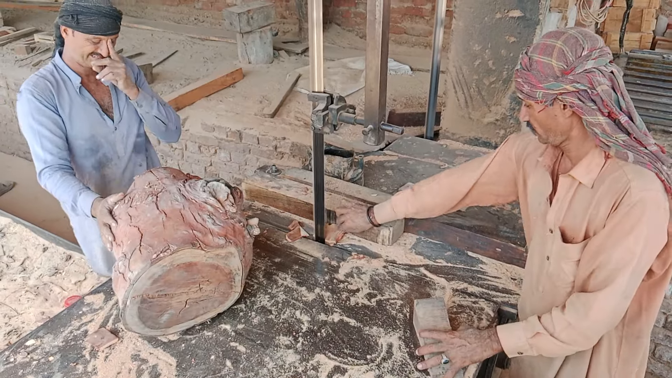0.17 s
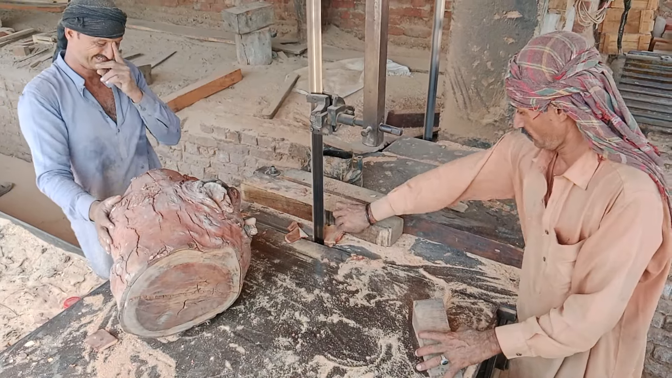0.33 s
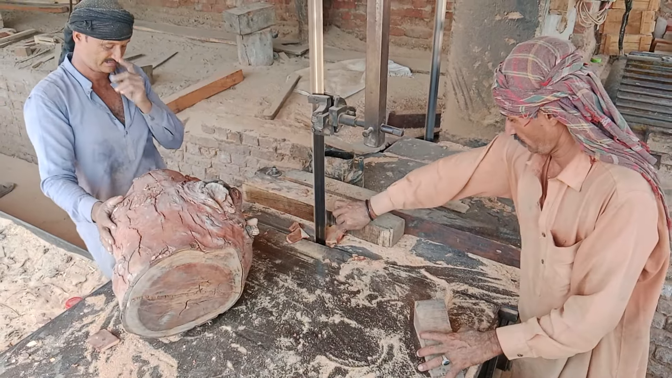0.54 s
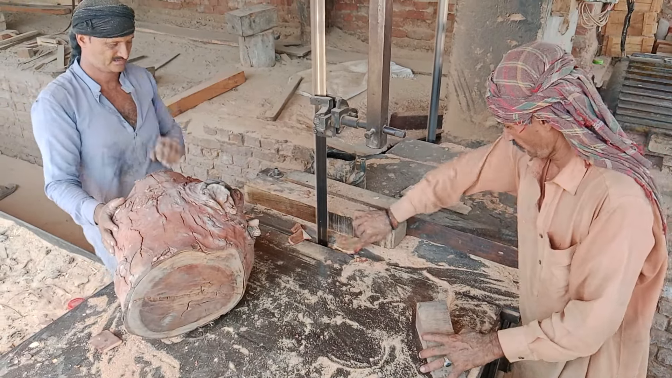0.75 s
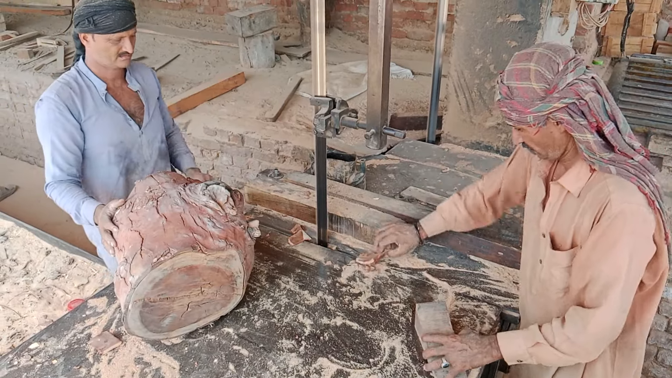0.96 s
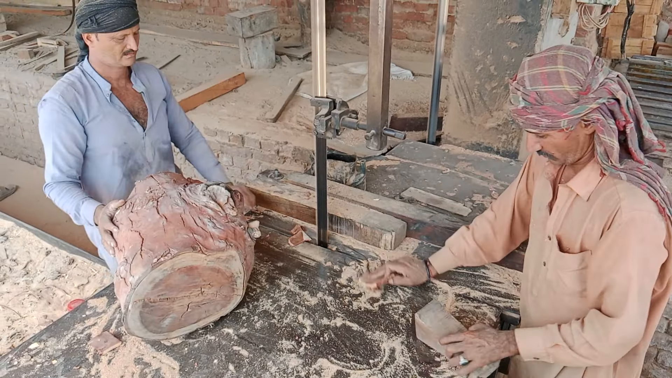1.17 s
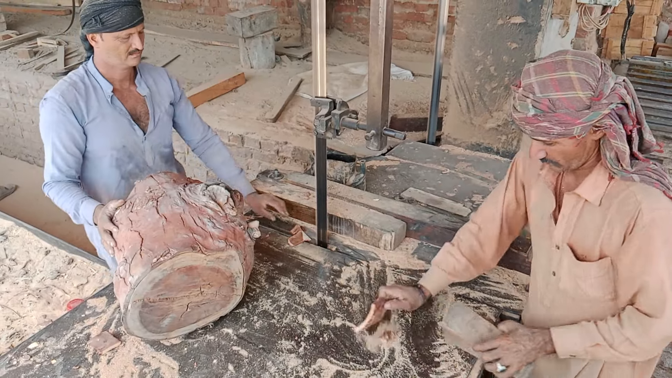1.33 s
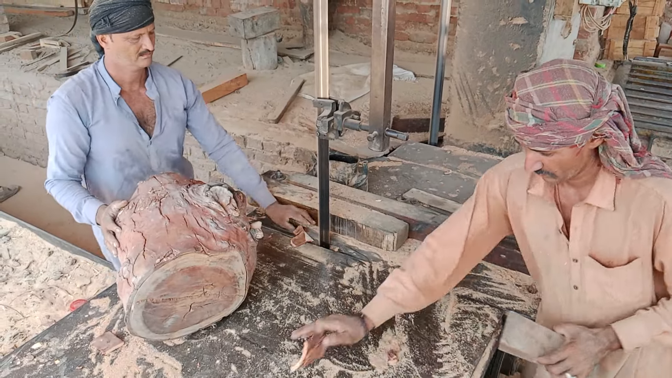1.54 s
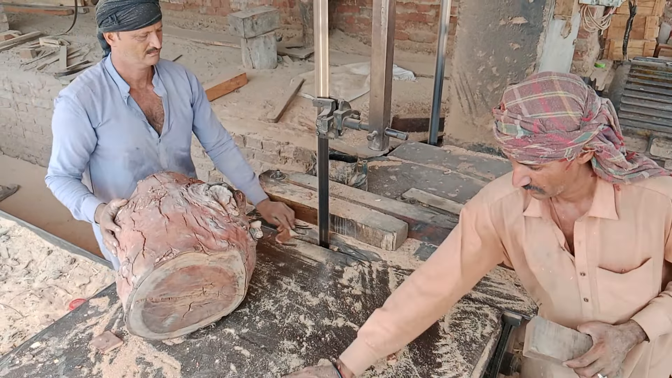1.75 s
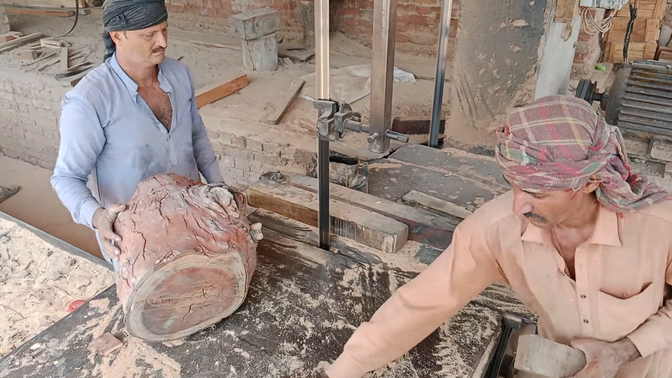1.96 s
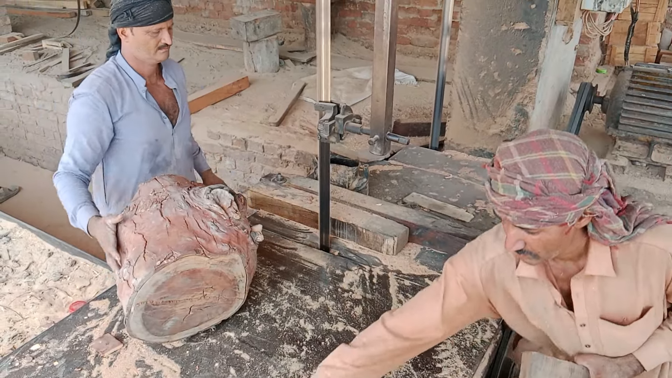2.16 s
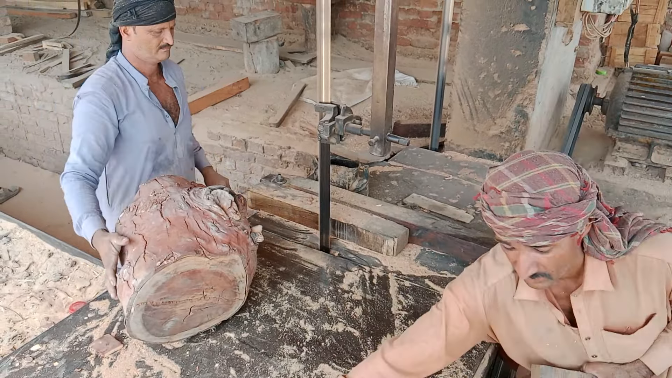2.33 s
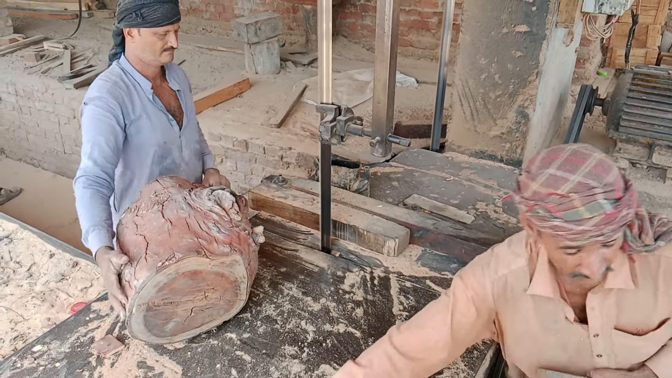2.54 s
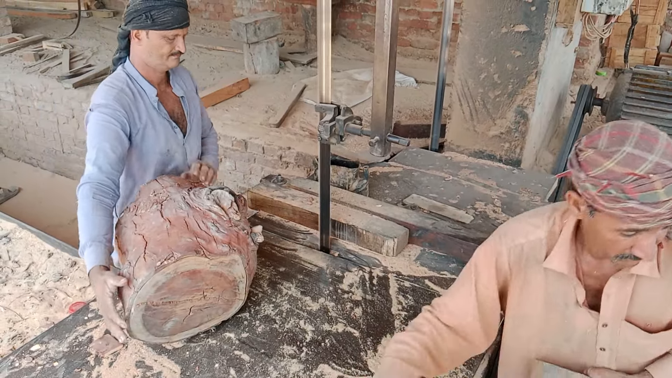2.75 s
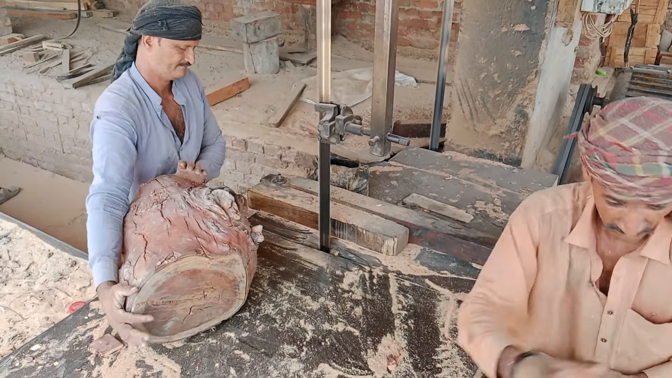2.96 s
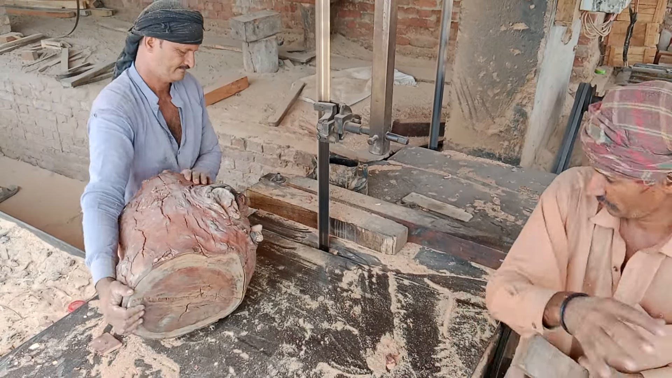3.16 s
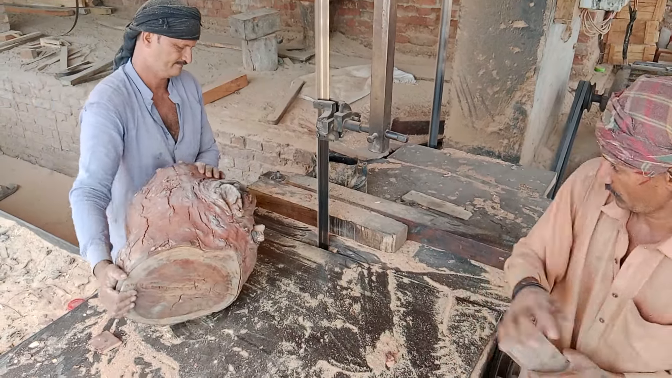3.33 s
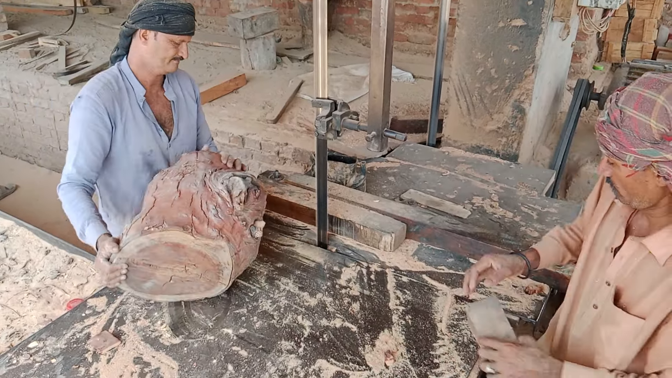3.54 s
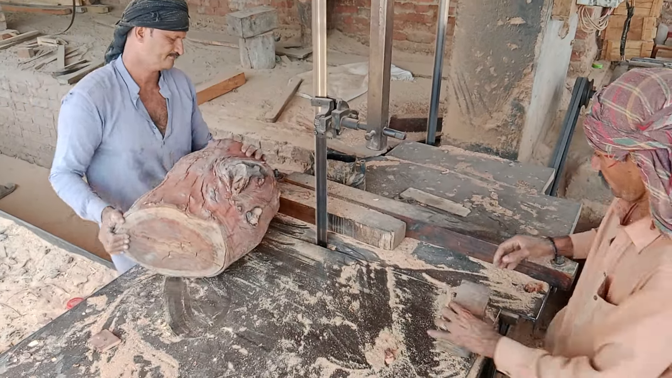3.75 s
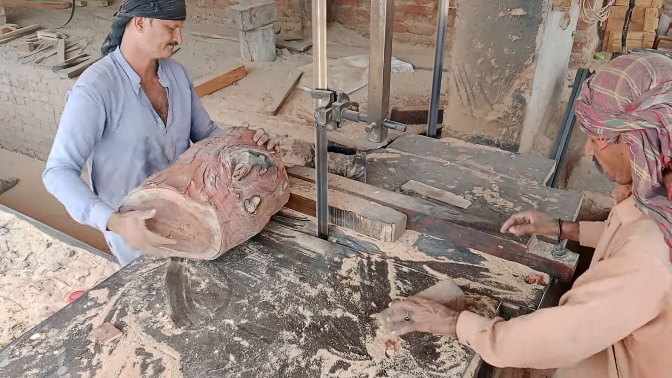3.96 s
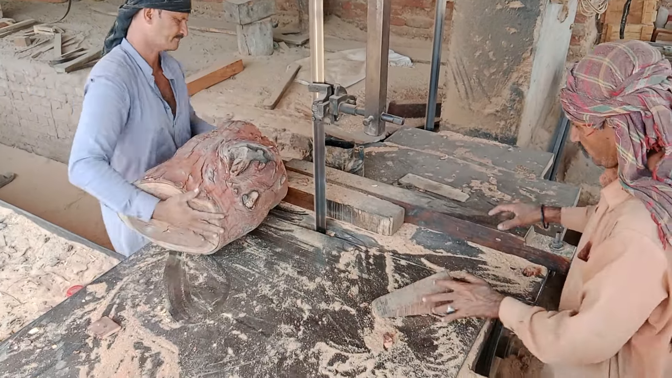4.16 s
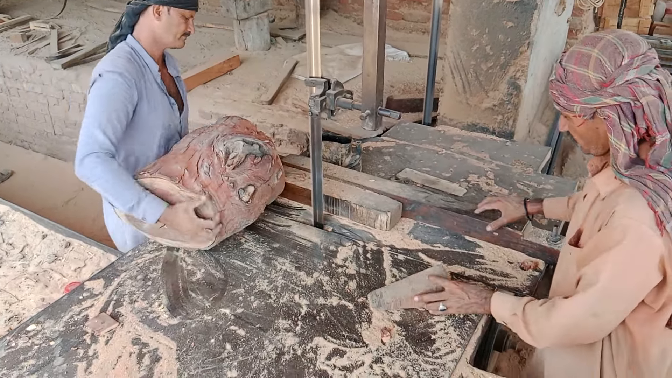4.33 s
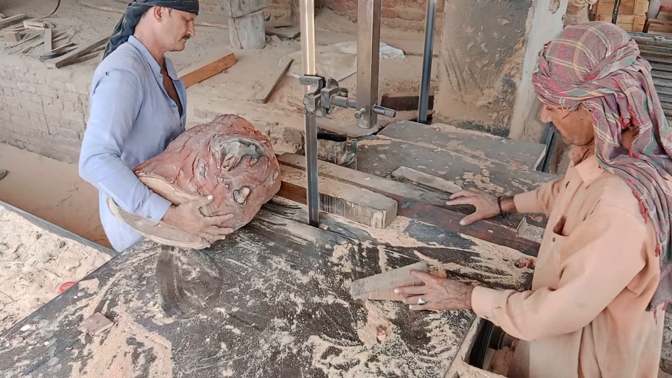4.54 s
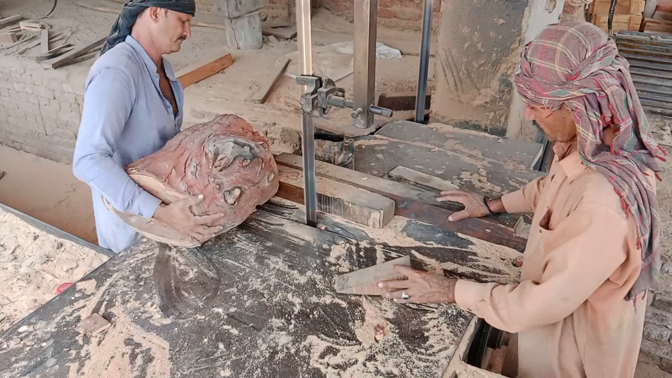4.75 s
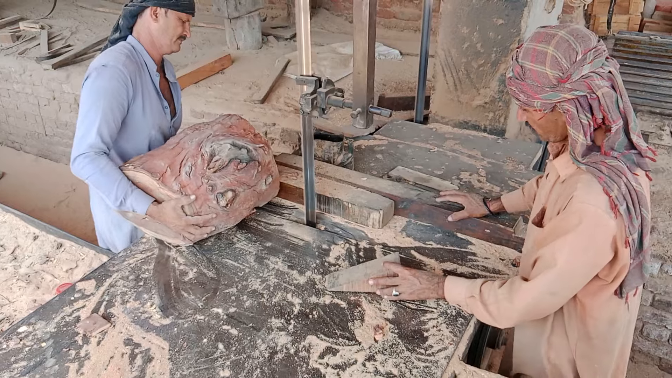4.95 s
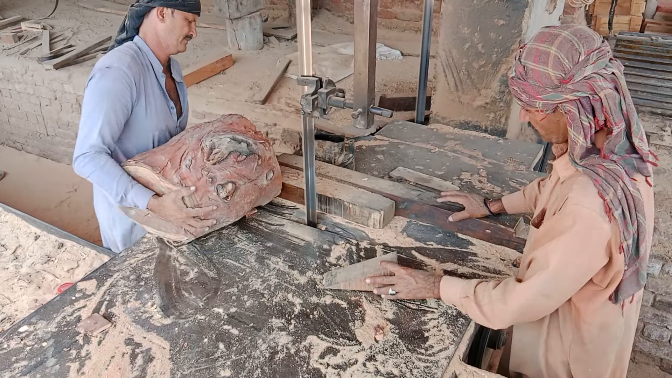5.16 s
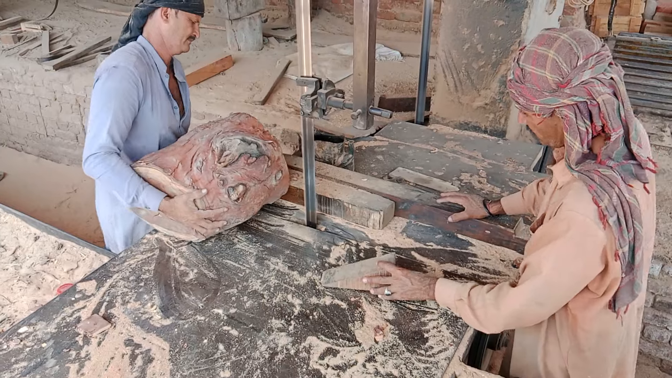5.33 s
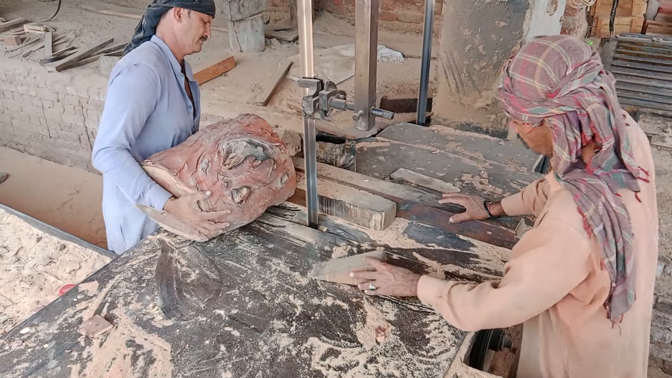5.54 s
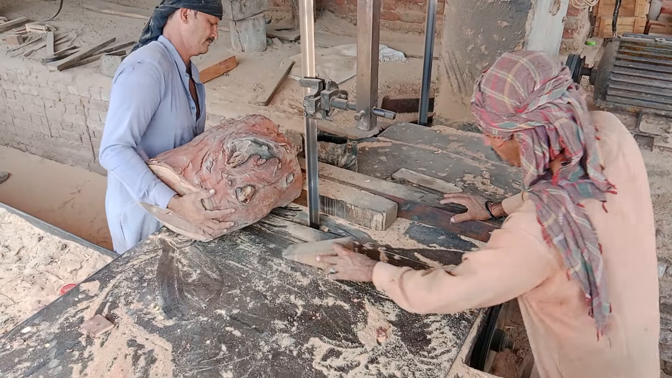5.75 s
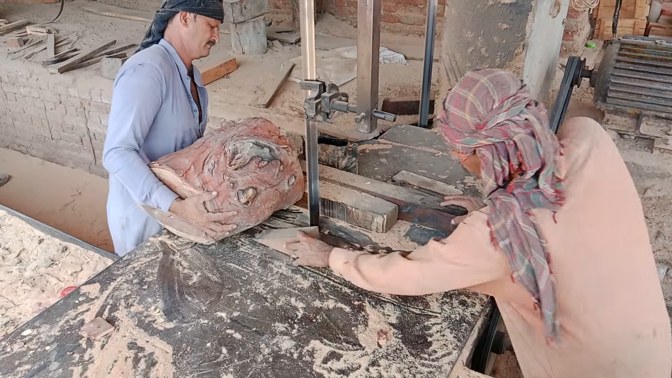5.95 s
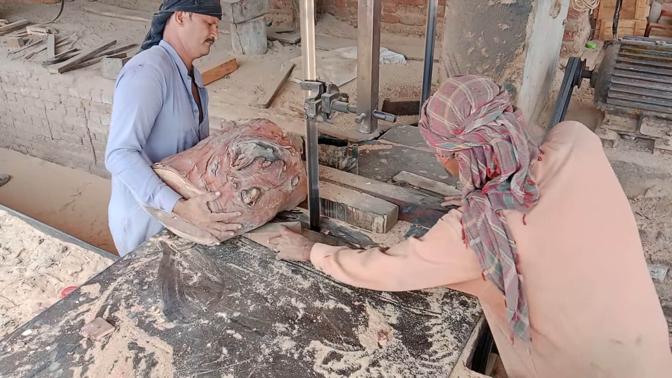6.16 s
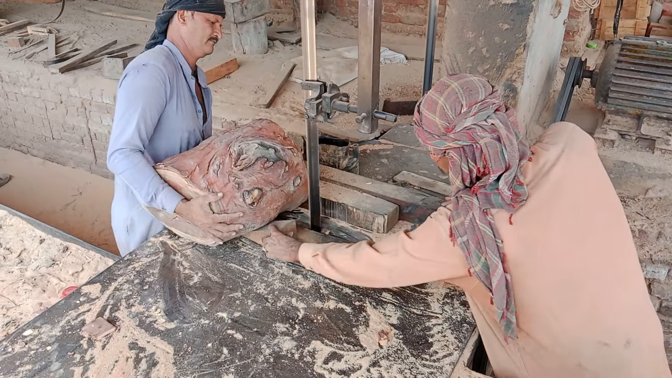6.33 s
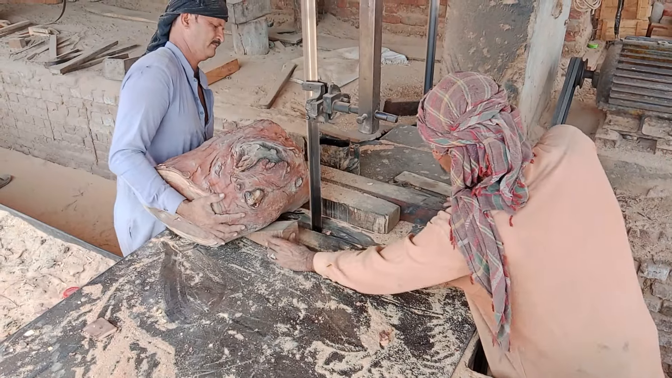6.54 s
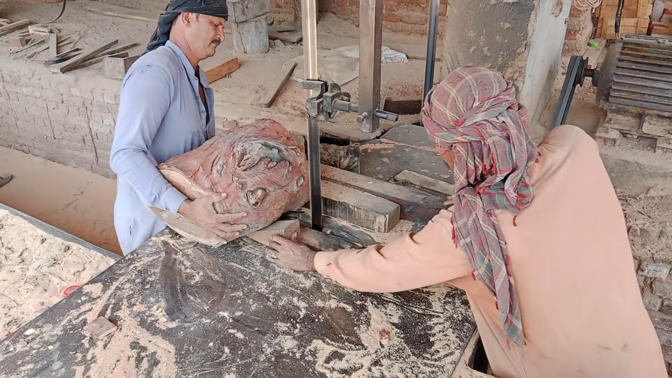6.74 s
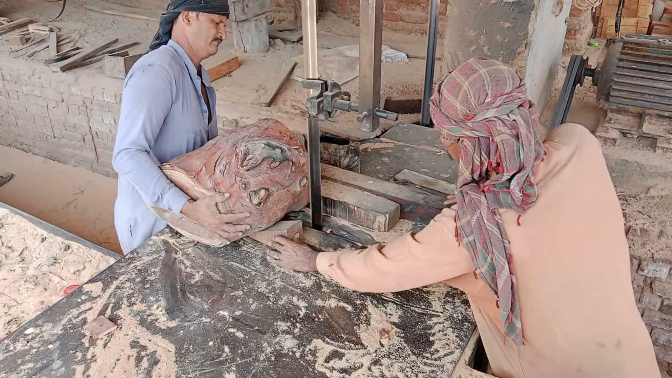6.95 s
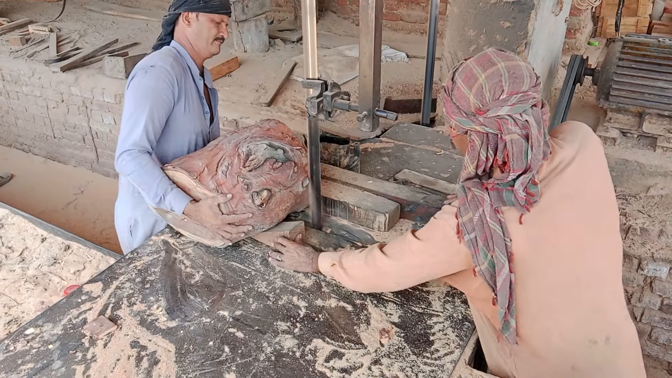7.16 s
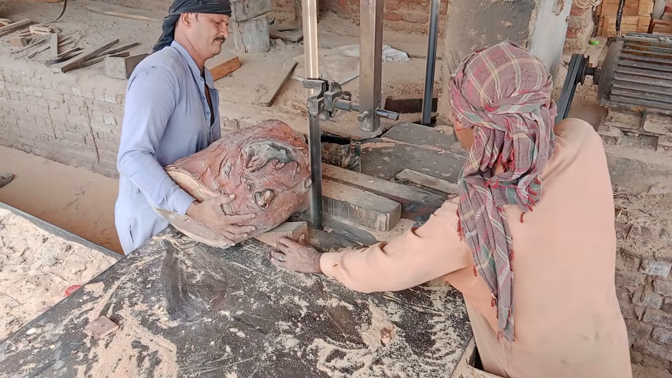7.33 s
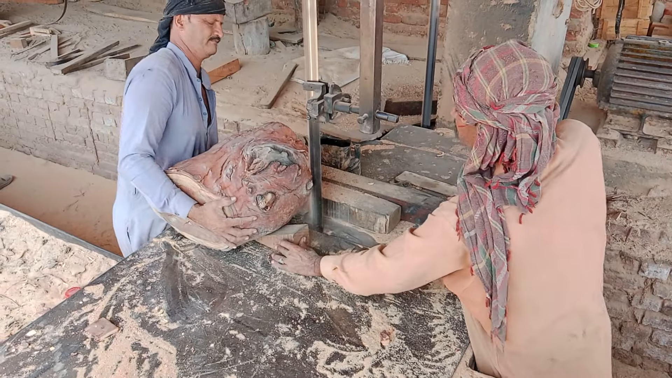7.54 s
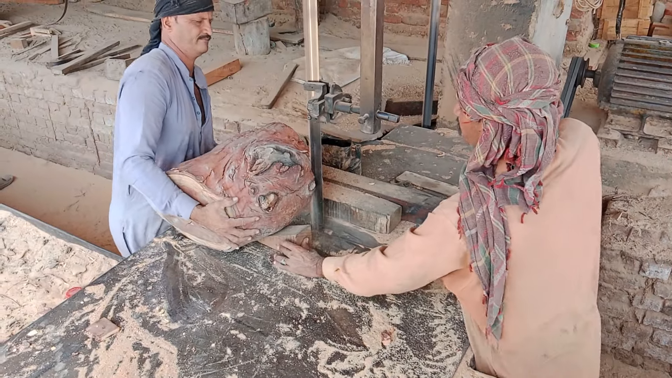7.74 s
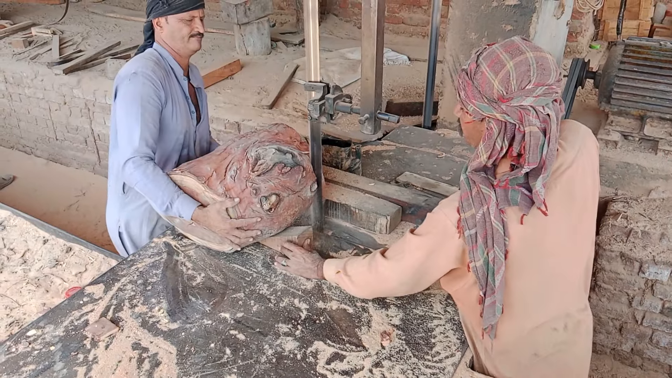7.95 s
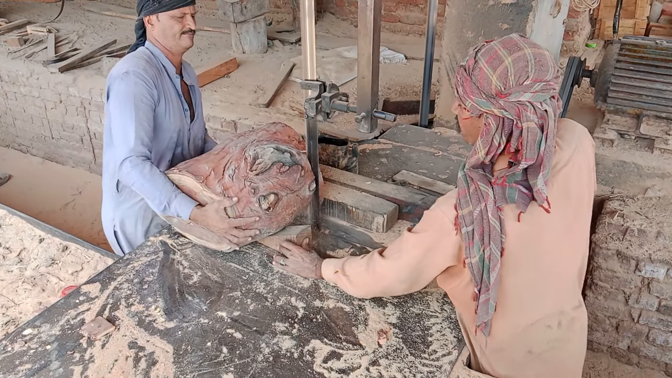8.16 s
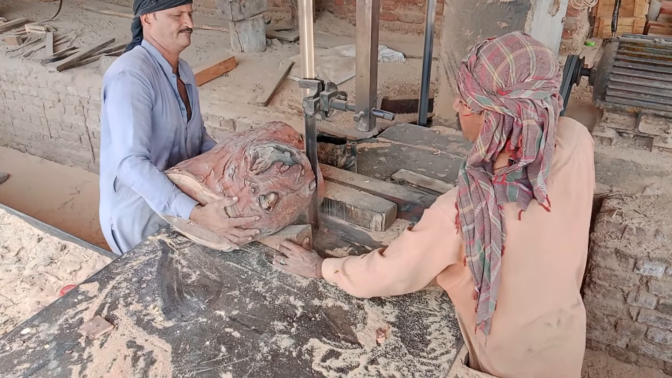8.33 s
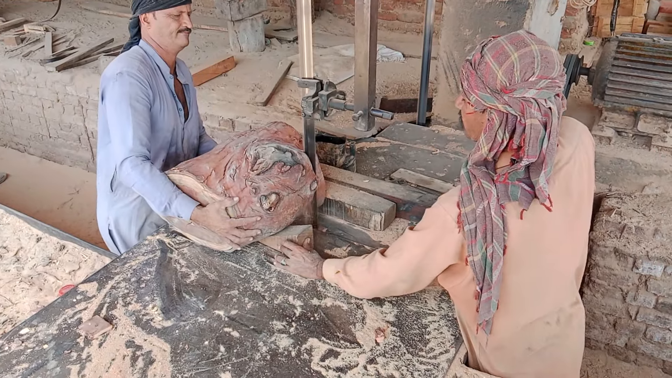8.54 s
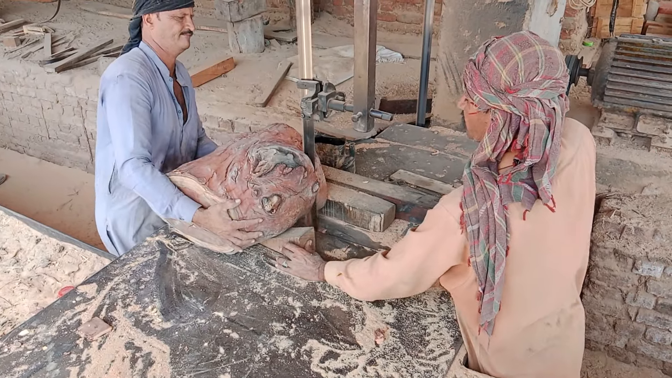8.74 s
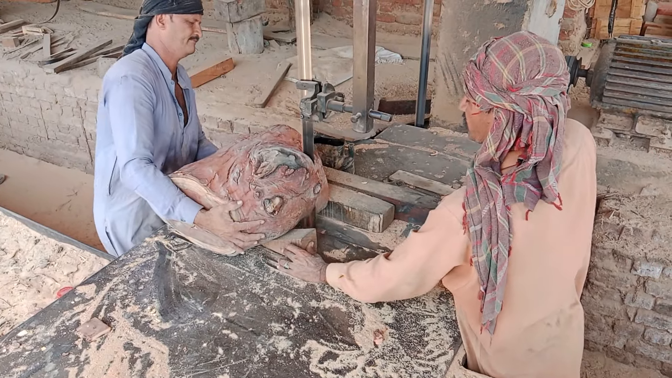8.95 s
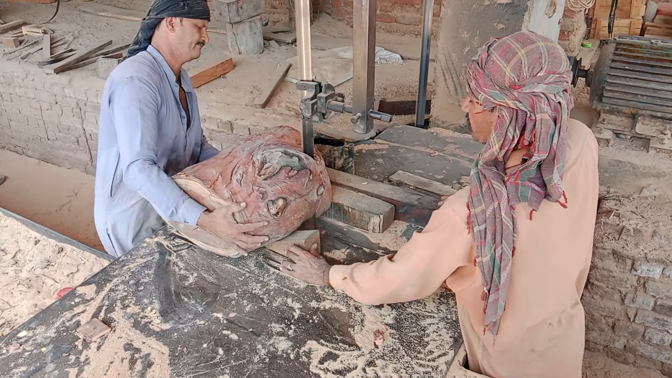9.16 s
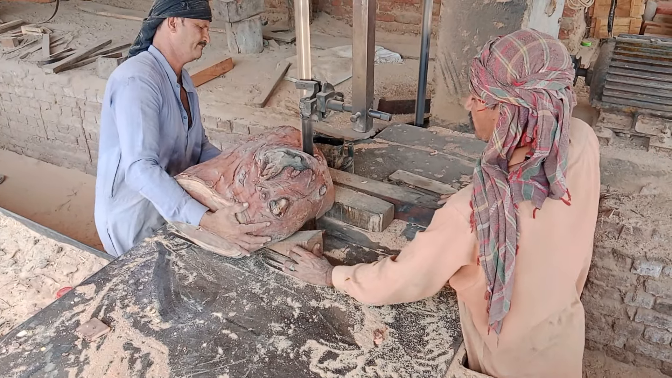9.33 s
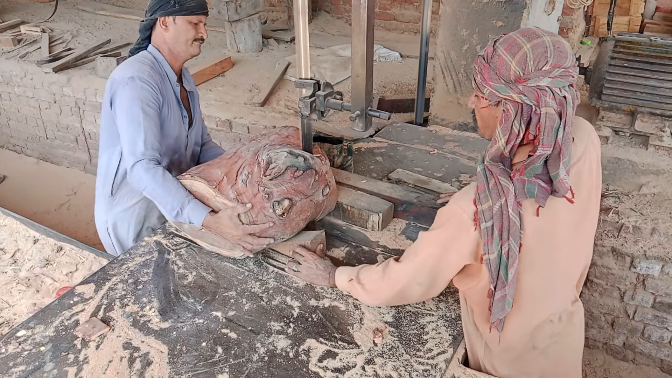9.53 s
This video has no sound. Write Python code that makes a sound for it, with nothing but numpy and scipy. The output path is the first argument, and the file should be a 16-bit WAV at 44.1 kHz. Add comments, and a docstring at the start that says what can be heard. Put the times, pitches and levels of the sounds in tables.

```python
"""Band saw cutting a log

In an open shed a big band saw idles: the steel band hisses and whines over its wheels, rubbed by guides and rims,
above a low frame rumble that drops out briefly now and then. A log is set on the table with a few wooden knocks.
Then the teeth bite: sharp taps on the tooth rate and tearing noise make the band sing, and a lumpy low roar,
slackening about four times a second, overloads one small mono microphone. The sources are dry, without echo.
All are filtered noise and taps, except the knocks: decaying sine modes of the wood."""
import sys
import numpy as np
from scipy import signal
from scipy.fft import rfft, irfft, next_fast_len
from scipy.io import wavfile

SR = 44100
rng = np.random.default_rng(int(sys.argv[2]) if len(sys.argv) > 2 else 0)


def invert_db(level):
    """Linear amplitude ratio for a level in decibels (20 dB per decade), elementwise."""
    return 10 ** (np.asarray(level, dtype=float) / 20)


def wrap_up_sound(samples):
    """Save the sound to the file named by the first command line argument, as 16-bit audio."""
    columns = np.atleast_2d(samples).T
    # keep every value between -1 and 1, then stretch to whole-number steps
    tamed = np.clip(columns, -1, 1)
    steps = np.round(tamed * 32767).astype(np.int16)
    wavfile.write(sys.argv[1], SR, steps)


N = 427329   # samples
SIZE = next_fast_len(N)
HZ = np.arange(SIZE // 2 + 1) * SR / SIZE + 1e-3   # frequency of each spectrum bin, kept above zero
TIME_S = np.arange(N) / SR


def rms_one(x):
    """Scales a signal to an rms of one."""
    return x / np.sqrt(np.mean(x ** 2) + 1e-20)


def in_time(rows):
    """Draws straight lines between timed rows, one curve per column after the time."""
    s, *columns = np.transpose(rows)
    return [np.interp(TIME_S, s, column) for column in columns]


def density(points, axis=1):
    """Power per Hz from a (Hz, dB) table, falling away beyond its ends."""
    p = np.array(points)
    inside = invert_db(2 * np.interp(np.log(HZ), np.log(p[:, 0]), p[:, axis]))
    below = np.minimum(1, HZ / p[0, 0]) ** 4
    above = np.maximum(1, HZ / p[-1, 0]) ** 2
    return inside * below / above


def drift(rate_hz):
    """Slow chance with spread 1: noise through two equal low-pass poles, made at a twentieth of the rate."""
    pole = np.exp(-2 * np.pi * rate_hz * 20 / SR)
    noise = rng.standard_normal(N // 20 + 4002)
    slow = signal.lfilter([1], [1, -2 * pole, pole * pole], noise)[4000:]   # settled part only
    return np.interp(np.arange(N) / 20, np.arange(len(slow)), rms_one(slow))


def colour(x, power):
    """Filters a signal by a power spectrum and scales it to an rms of one."""
    return rms_one(irfft(rfft(x, SIZE) * np.sqrt(power), SIZE)[:N])


# The load slows the band. Columns: time_s, tooth_rate (teeth per s)
TOOTH_RATE = [(7.2, 630), (8.0, 618.5), (9.0, 616), (9.69, 613.5)]


def teeth(bite_db, clean, cutting):
    """One sharp tap per tooth, uneven in time and depth, plus tearing fibres, all ringing the band."""
    rate, = in_time(TOOTH_RATE)
    wandering = rate * (1 + .002 * drift(6.0))
    count = np.cumsum(wandering) / SR + .004 * drift(120.0)   # teeth passed so far
    taps = sum(np.cos(2 * np.pi * k * count) for k in range(1, 26))   # equal harmonics make a pulse
    tooth_depth = invert_db(1.6 * rng.standard_normal(int(count.max()) + 3))
    depth = tooth_depth[np.round(count).astype(int)]
    tearing = rng.standard_normal(N) * invert_db(1.25 * drift(22.0))
    singing = colour(clean * rms_one(taps * depth) + tearing, band_response(axis=2))
    return cutting * invert_db(bite_db) * singing


# Wave families of the band, each starting at a cut-on pitch; levels compare within a state.
# Columns: cut_on_hz, edge_hz, fall_off_hz, idle_level_db, cutting_level_db
FAMILIES = [(2541, 23.5, 430, -4.5, -21), (4605, 330, 3050, -13, -16), (6718, 85, 820, 0.5, -1),
            (12400, 370, 2000, -15, -12.5)]
# Hiss under the families, relative. Columns: pitch_hz, idle_level_db (per Hz), cutting_level_db (per Hz)
HISS = [(298, -43, -40), (445, -34, -38), (626, -20.5, -44), (1162, -23, -16.5), (1155, -33, -19),
        (1480, -24, -34), (2070, -19, -32), (2250, -22, -24), (3800, -23, -38), (6750, -9, -9.5),
        (8070, -11, -15.5), (9300, -28, -41), (11700, -26, -24.5), (13300, -26.5, -19), (14700, -13, -9.5),
        (16000, -35, -44)]


def band_response(axis):
    """Each family starts abruptly at its cut-on, where its modes crowd, and thins out above."""
    power = density(HISS, axis=axis)   # axis 1 is idle, 2 is cutting
    for hz, edge_hz, fall_hz, *level_db in FAMILIES:
        above = (HZ - hz) / edge_hz
        onset = 1 / (1 + np.exp(-np.clip(3.5 * above, -50, 50)))
        crowding = 1 / np.sqrt(1 + np.abs(above))
        thinning = np.exp(-np.maximum(HZ - hz, 0) / fall_hz)
        power += invert_db(2 * level_db[axis - 1]) * onset * crowding * thinning
    return power


# Relative spectrum of the low roar. Columns: pitch_hz, level_db (per Hz)
ROAR_LOW = [(30, -74), (60, -12.5), (100, -1), (200, 1), (400, -1), (700, -5.5), (1400, -17.5)]
# Relative spectrum of the upper rasp. Columns: pitch_hz, level_db (per Hz)
ROAR_HIGH = [(300, -3.5), (700, 1.5), (1200, -1), (2000, -6), (3500, -10.5), (6000, -15), (10000, -23)]


def roar(low_db, upper_db, depth_db, cutting):
    """Noise in lumps of a few to ten milliseconds; the upper rasp comes in sharper bursts."""
    lumps = depth_db * drift(163.0)
    even_db = -depth_db ** 2 * np.log(10) / 20   # keeps the mean power of the low roar
    low = invert_db(lumps + even_db) * colour(rng.standard_normal(N), density(ROAR_LOW))
    bursts = invert_db(0.85 * lumps + 2.2 * even_db + 2.7 * drift(250.0))
    high = bursts * colour(rng.standard_normal(N), density(ROAR_HIGH))
    return cutting * (invert_db(low_db) * low + invert_db(upper_db) * high)


# The bite slackens about every 0.23 s; a negative loss is a gain, sag and regrip are the bell's two widths.
# Columns: deepest_s, roar_loss_db, rasp_loss_db, sag_s, regrip_s
SLACKS = [(7.226, 11, 14, 0.026, .014), (7.33, 14, 22, 0.032, 0.014), (7.564, 8, 12, .03, .012),
          (7.785, -1, 1.5, .05, 0.028), (8.02, 1, 3, .05, 0.023), (8.25, 2, 6, 0.059, 0.018),
          (8.48, -2.5, 7.5, .05, 0.022), (8.705, 9.5, 22, .025, 0.017), (8.92, 6.5, 12, 0.031, 0.036),
          (9.178, 11, 10, 0.056, 0.013), (9.405, 8.5, 12, 0.057, 0.04), (9.6, 14, 23, .025, 0.058)]


def slackening():
    """Losses in dB of roar and rasp: a bell per slack moment, with its own fall and rise."""
    losses_db = np.zeros((2, N))
    for s, roar_db, rasp_db, sag_s, regrip_s in SLACKS:
        width_s = np.where(TIME_S < s, sag_s, regrip_s)
        bell = np.exp(-((TIME_S - s) / width_s) ** 2)
        losses_db += np.outer([roar_db, rasp_db], bell)
    return losses_db


SWAY_HZ = 2.9   # rate of a slow sway in the idle, per second
# Level of the idling band. Columns: time_s, hiss_level_db
IDLE = [(0.0, -18.5), (0.47, -19.5), (1.1, -19), (3.2, -19), (3.68, -18.5), (6.31, -19.5), (6.8, -19),
        (7.1, -20)]
# Single frame and band modes. Columns: pitch_hz, width_hz
IDLE_MODES = [(890, 45), (1064, 30), (1763, 35), (1885, 60), (2548, 45), (2994, 45), (3220, 120),
              (3512, 55), (3788, 50), (3970, 150), (4136, 65), (4293, 55), (5200, 260), (6762, 90)]
# Their levels on the scale of the idle hiss, in the same order. Column: level_db
IDLE_MODE_DB = [-15.5, -18, -16, -18.5, -6, -10.5, -12, -14, -13, -17, -12.5, -14, -12, -18]


def idling_band(patchy_db):
    """Guides and wheel rims rub the band; each region flutters on its own and a little with the others."""
    hiss_db, = in_time(IDLE)
    power = band_response(axis=1)
    for (hz, width_hz), db in zip(IDLE_MODES, IDLE_MODE_DB):
        power += invert_db(2 * db) / (1 + (2 * (HZ - hz) / width_hz) ** 2) ** 2
    spectrum = rfft(rng.standard_normal(SIZE)) * np.sqrt(power)
    edges = np.geomspace(200, 17000, 13)
    together = drift(6.0)
    sway = np.cos(2 * np.pi * SWAY_HZ * TIME_S + 1.0)
    out = np.zeros(N)
    for low, high in zip(edges, edges[1:]):
        part = irfft(spectrum * ((HZ >= low) & (HZ < high)), SIZE)[:N]
        calm = (1000 / low) ** 0.46   # the treble is steadier
        top_flutter_db = .8 * drift(17.0) * (low > 9000)   # the very top has an extra fast flutter
        patches = 1.8 * together + 1.5 * drift(3.3) + 2.0 * drift(15.4) + 0.081 * sway   # sway is very faint
        out += part * invert_db(top_flutter_db + patchy_db * calm * patches)
    return invert_db(hiss_db) * rms_one(out)


# Blows of wood on the table, before the wood's own mode levels.
# Columns: start_s, level_db, pitch_hz (the pitch each blow favours)
KNOCKS = [(3.891, -15.5, 920), (3.924, -18.5, 705), (3.935, -8, 960), (3.944, -0.5, 240), (5.433, -15, 740)]
# Modes of the wood. Columns: pitch_hz, level_db, t60_s (time to fall 60 dB)
WOOD = [(190, -4, 0.052), (400, 6, 0.043), (605, -0.5, 0.043), (698, 6.5, 0.027), (937, -1.5, 0.048),
        (1040, -14, 0.091), (1240, -2, 0.085), (1610, 8, 0.061)]


def knocks():
    """Soft blows on wood; each wakes mostly the modes near its own pitch, which swell over a few cycles."""
    start_s, blow_db, blow_hz = np.transpose(KNOCKS)
    out, t = np.zeros(N), np.arange(SR // 5) / SR
    for hz, db, t60 in WOOD:
        swell = (1 - np.exp(-t * hz / 1.1)) ** 2
        ring = swell * invert_db(-60 * t / t60) * np.sin(2 * np.pi * hz * t)
        away_db = -36.0 * np.abs(np.log2(hz / blow_hz))   # 36 dB weaker per octave away
        signs = rng.choice([-1, 1], len(start_s))
        for s, gain in zip(start_s, invert_db(blow_db + db + away_db) * signs):
            first = round(s * SR)
            out[first:first + len(t)] += gain * ring
    return out


# Relative spectrum of the frame rumble. Columns: pitch_hz, level_db (per Hz)
RUMBLE = [(60, -15.5), (110, -6.5), (170, 3), (260, -2.5), (340, -7.5), (420, -30)]
RUMBLE_BED_DB = -53   # floor that stays in the drop-outs


def frame_rumble(rumble_db):
    """The frame rumbles in uneven swells over a slow, regular sway."""
    sway = np.cos(2 * np.pi * SWAY_HZ * TIME_S + 2.3)
    swell = invert_db(1.0 * sway + 2.9 * drift(5.0) + 1.1 * drift(16.0))
    rumble = rms_one(swell * colour(rng.standard_normal(N), density(RUMBLE)))
    return np.hypot(invert_db(rumble_db), invert_db(RUMBLE_BED_DB)) * rumble


# Slow level of the rumble, before drop-outs and floor. Columns: time_s, level_db
RUMBLE_LEVEL = [(0, -42.5), (1.5, -41.5), (2.7, -48), (3.9, -40.5), (5.3, -42.5), (6.2, -44), (7.1, -48)]
# The rumble drops out briefly. Columns: centre_s, depth_db (before the floor), half_length_s
RUMBLE_GAPS = [(0.107, 18, 0.041), (0.418, 9, .025), (0.568, 9, .03), (0.737, 16, 0.059), (0.948, 6, .03),
               (1.1, 18, 0.058), (1.36, 11, 0.024), (1.55, 8, 0.034), (1.746, 11, 0.02), (1.89, 12, 0.021),
               (2.074, 22, 0.049), (2.557, 10, 0.049), (3.108, 18, 0.03), (3.505, 18, 0.031),
               (3.768, 20, .05), (4.265, 12, 0.063), (5.012, 24, 0.064), (5.583, 14, 0.022),
               (5.815, 10, 0.033), (6.11, 21, .04), (6.21, 10, .03), (6.455, 14, 0.08), (6.72, 12, 0.042),
               (7.075, 9, .04)]


def rumble_level():
    """Slow level in dB with rounded drop-outs."""
    level_db, = in_time(RUMBLE_LEVEL)
    for s, depth_db, half_s in RUMBLE_GAPS:
        level_db = level_db - depth_db * np.exp(-((TIME_S - s) / half_s) ** 2)
    return level_db


# The log against the band, before slackening. Columns: time_s, roar_level_db, lightness (of the feed, 0-1)
FEED = [(7.188, -38, 0.9), (7.196, -18, .9), (7.25, -15.5, 0.63), (7.4, -15, 0.21), (7.7, -15, 0.11),
        (8.1, -14.5, 0), (8.4, -15.5, 0), (8.6, -15, 0.37), (8.85, -15, .6), (9.69, -15, 0.66)]
ENTRY_S, BITE_RISE_S = 7.165, 0.012   # the first teeth touch the wood; time constant of the singing
# "LIGHT" settings are the change from full feed (lightness 0) to lightness 1
RASP_DB, RASP_LIGHT_DB = 3.0, 9.5   # upper rasp over the roar, and its loss
LUMPS_DB, LUMPS_LIGHT_DB = 1.3, 5   # choppiness, and its gain: a lighter feed is choppier
BITE_DB, BITE_LIGHT_DB = -13, 2.5   # singing of the teeth, and its loss
BITE_PER_SLACK = 0.2   # dB of singing lost per dB of slack in the roar
CLEAN_TAPS = 0.51   # clean taps against tearing


def scene():
    """All sources reach one microphone; feed and slack shape the singing and the roar of the cut."""
    feed_db, light = in_time(FEED)
    slack_db, rasp_slack_db = slackening()
    since_s = np.maximum(TIME_S - ENTRY_S, 0)
    cutting = 1 - np.exp(-since_s / BITE_RISE_S)
    bite_db = BITE_DB - BITE_LIGHT_DB * light - BITE_PER_SLACK * slack_db
    upper_db = feed_db + RASP_DB - RASP_LIGHT_DB * light - rasp_slack_db
    lumps_db = np.maximum(LUMPS_DB + LUMPS_LIGHT_DB * light, 0)
    mono = teeth(bite_db, CLEAN_TAPS, cutting)
    mono += roar(feed_db - slack_db, upper_db, lumps_db, since_s > 0)
    mono += idling_band(patchy_db=0.55) + knocks() + frame_rumble(rumble_level())
    return np.array([mono, mono])


def band_limit(x):
    """A steep low-pass at the top of the band."""
    return signal.sosfilt(signal.butter(12, 16360, fs=SR, output="sos"), x)


OVERLOAD, HARDNESS = .48, 4.5   # ceiling of the input stage (full scale is 1), and how sharply it is met
LOW_CUT_HZ, CUTOFF_HZ = 38, 15730


def record(dry):
    """The microphone's input stage flattens the peaks at a firm ceiling; the lowest bass and the top are cut."""
    flat = dry / (1 + np.abs(dry / OVERLOAD) ** HARDNESS) ** (1 / HARDNESS)
    low_cut = signal.butter(2, LOW_CUT_HZ, "high", fs=SR, output="sos")
    flat = signal.sosfilt(low_cut, flat)
    mix = irfft(rfft(flat, SIZE) * (HZ < CUTOFF_HZ), SIZE)[:, :N]
    return band_limit(mix)


dry = scene()
out = record(dry)
wrap_up_sound(out)
```